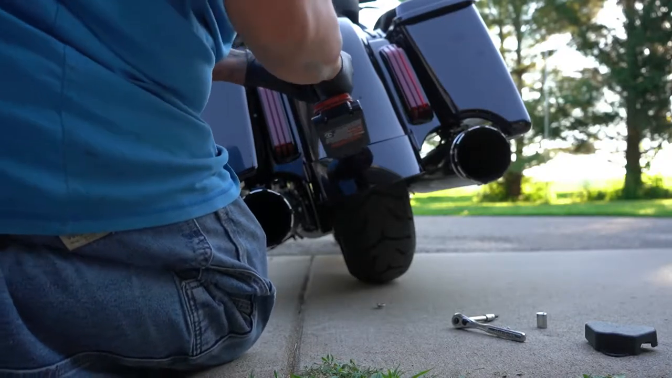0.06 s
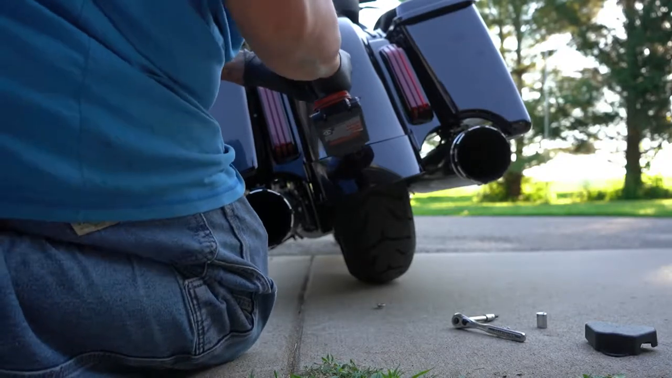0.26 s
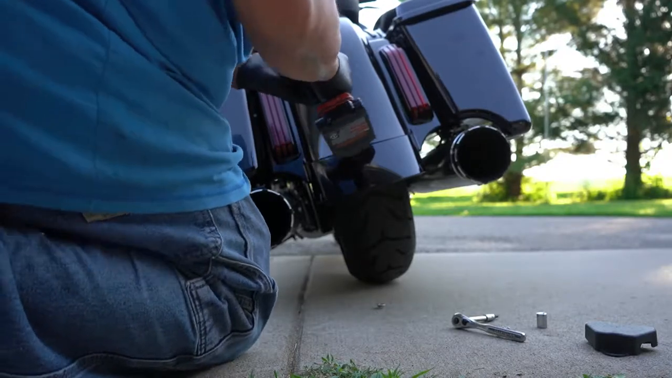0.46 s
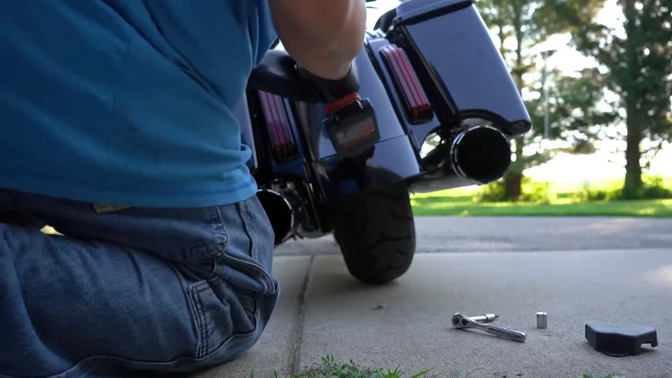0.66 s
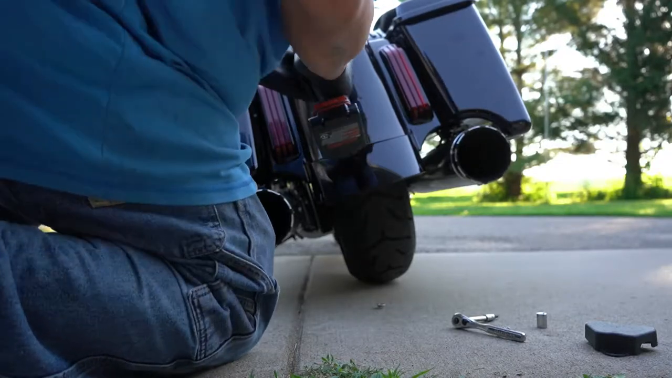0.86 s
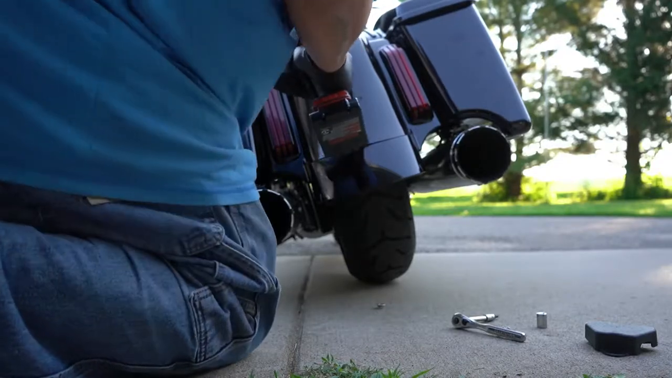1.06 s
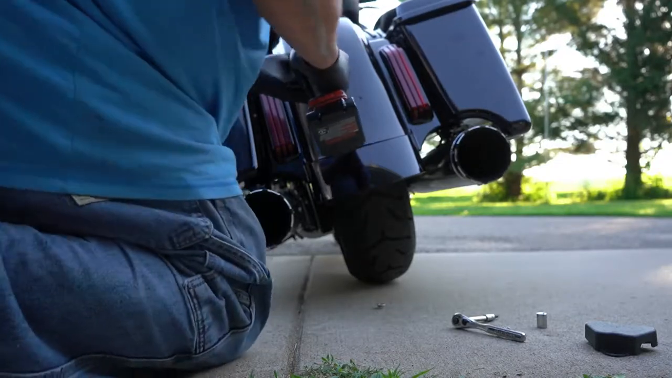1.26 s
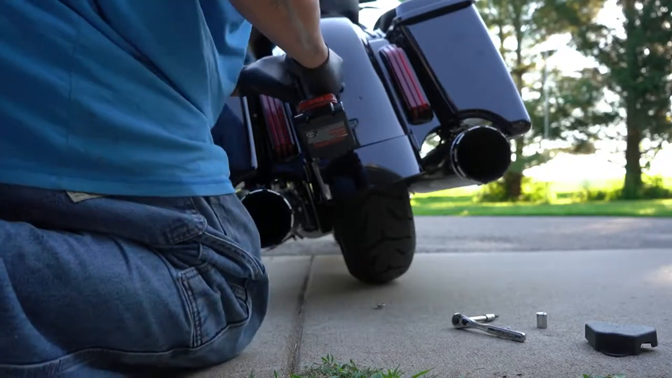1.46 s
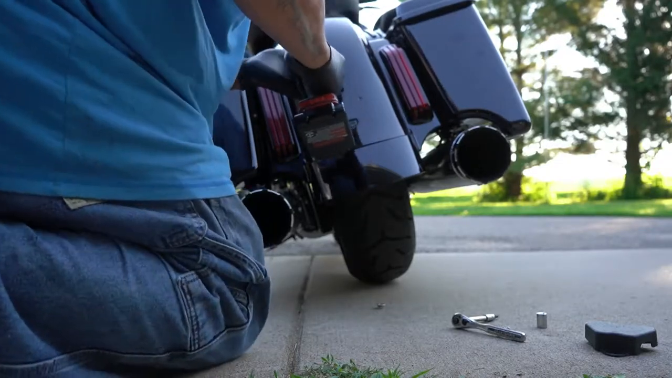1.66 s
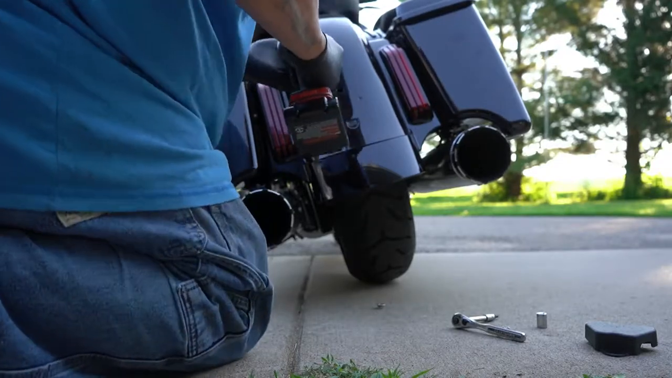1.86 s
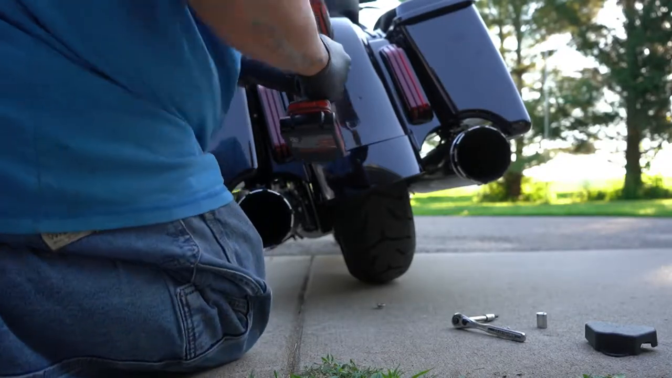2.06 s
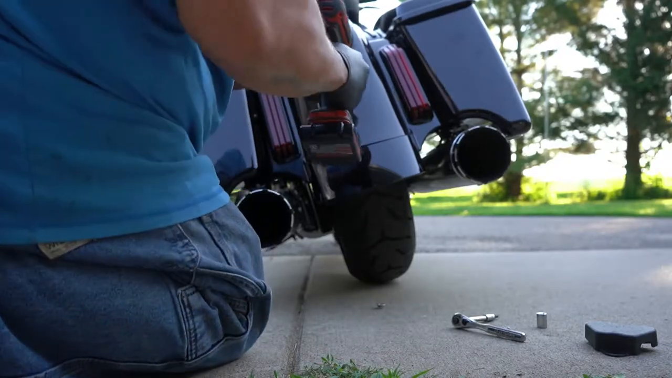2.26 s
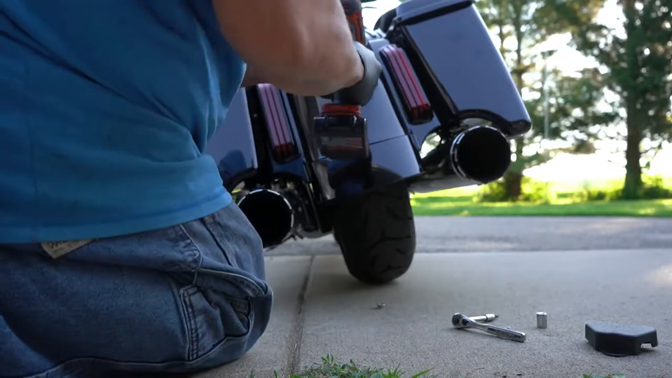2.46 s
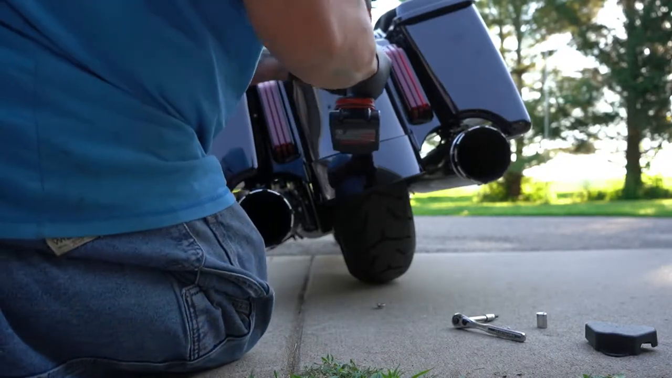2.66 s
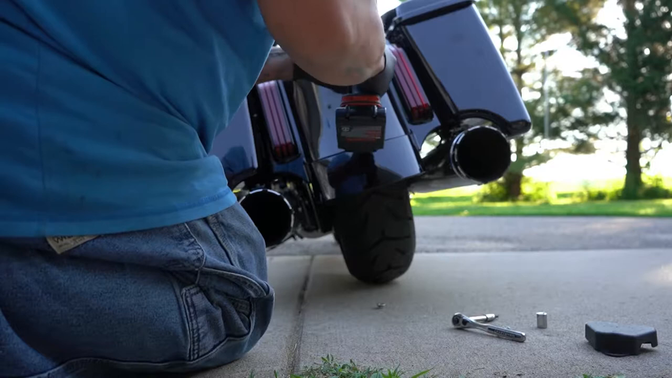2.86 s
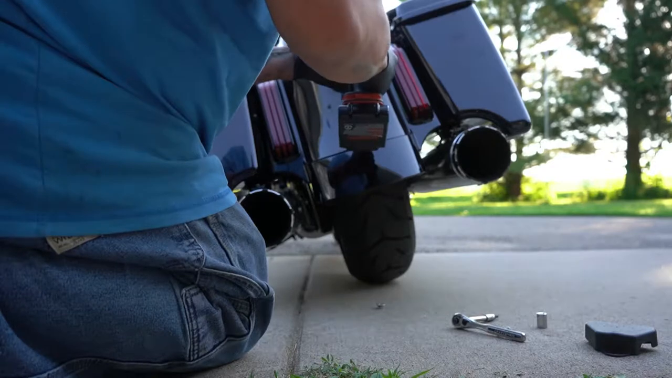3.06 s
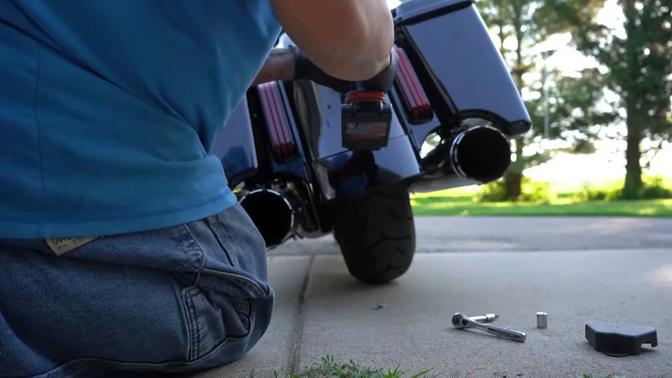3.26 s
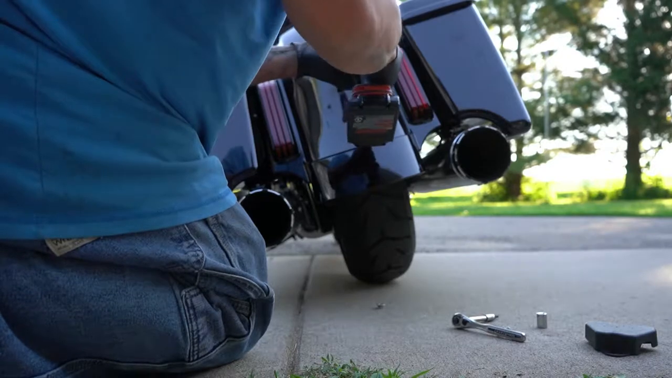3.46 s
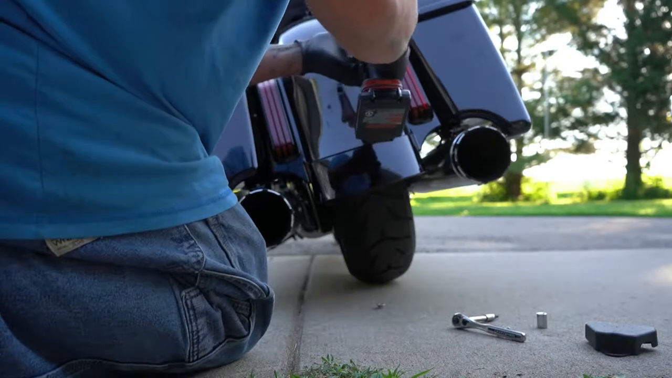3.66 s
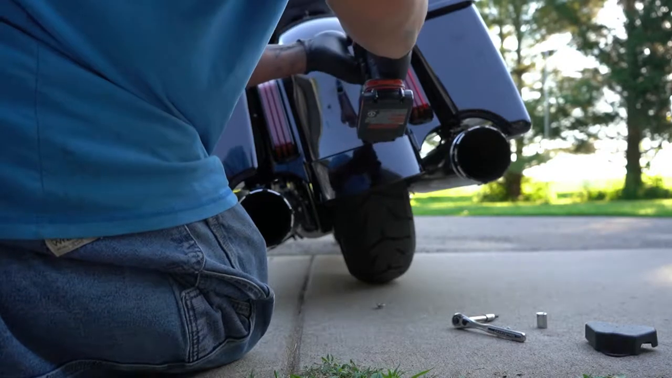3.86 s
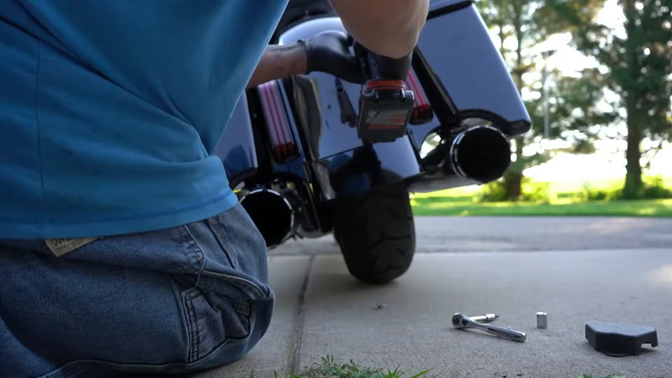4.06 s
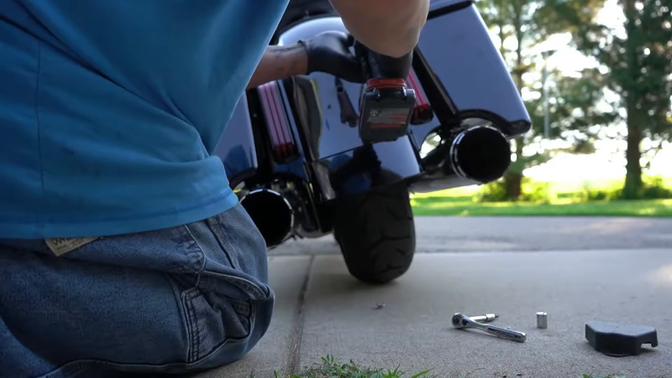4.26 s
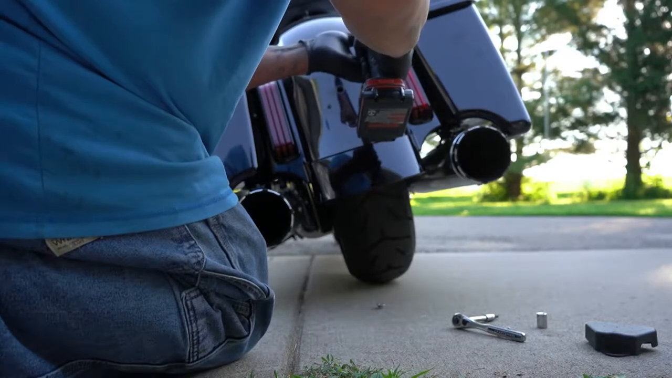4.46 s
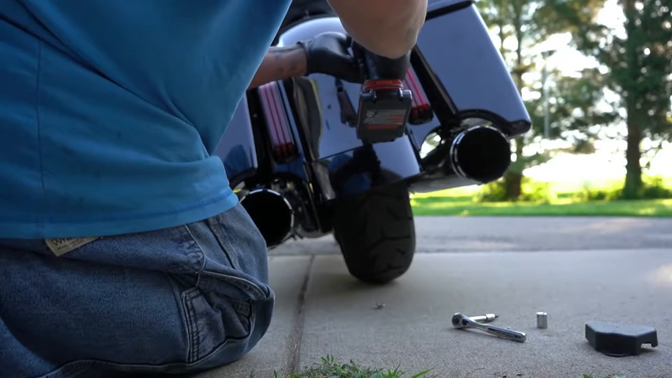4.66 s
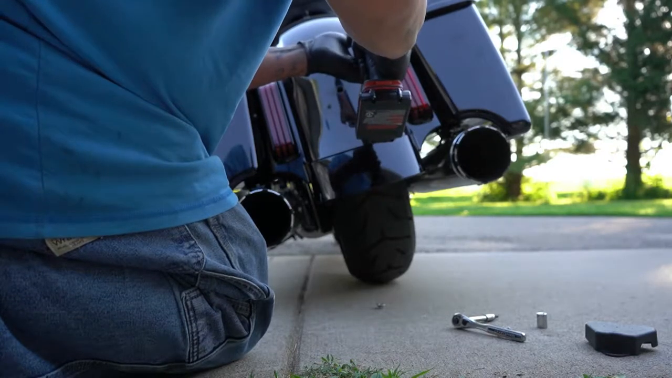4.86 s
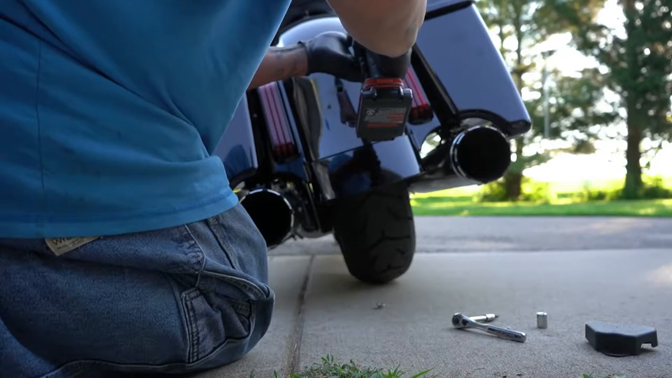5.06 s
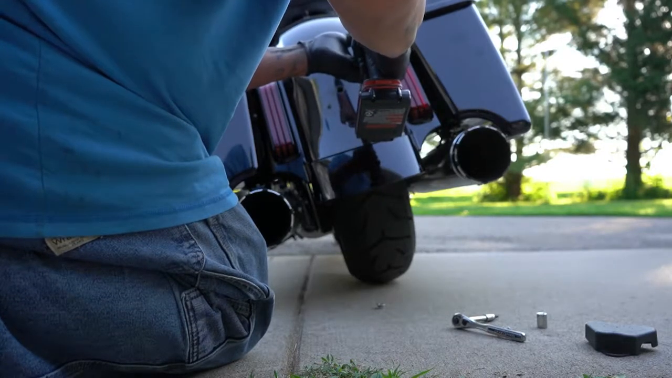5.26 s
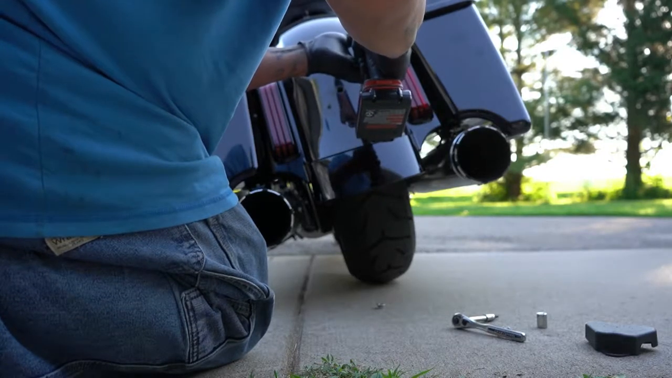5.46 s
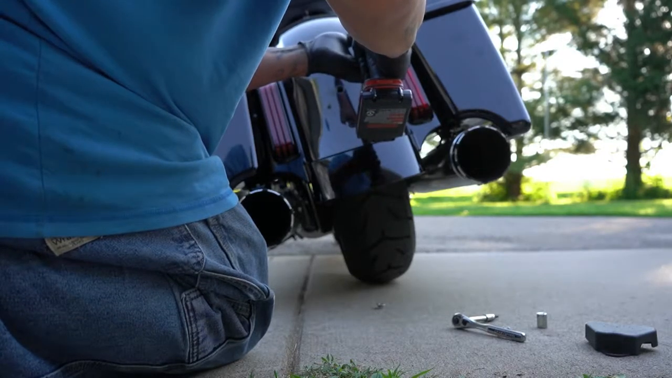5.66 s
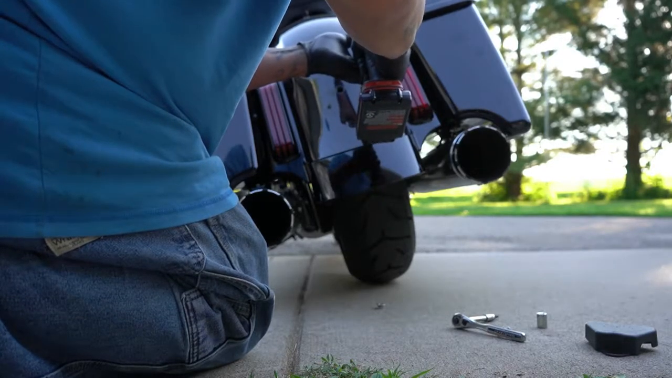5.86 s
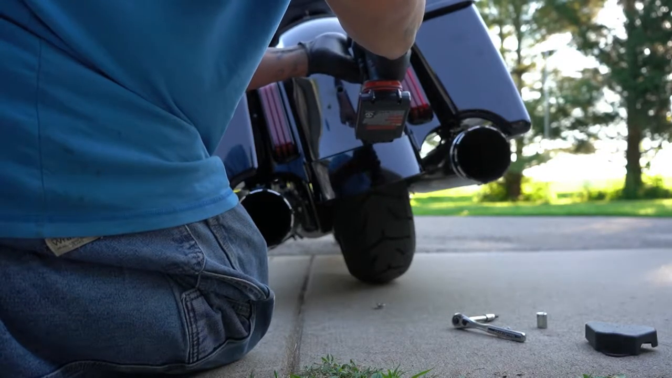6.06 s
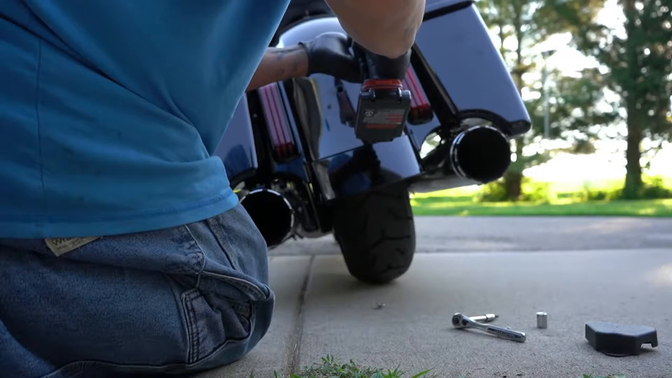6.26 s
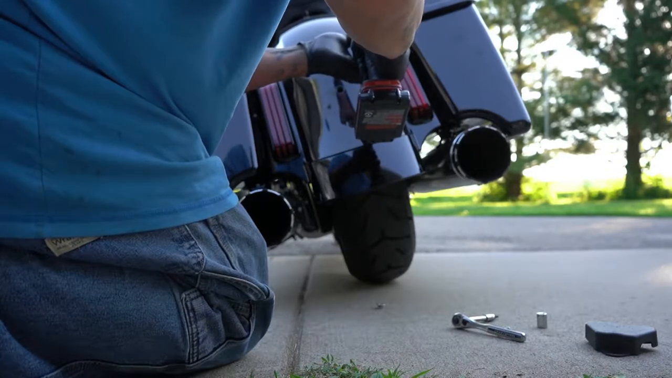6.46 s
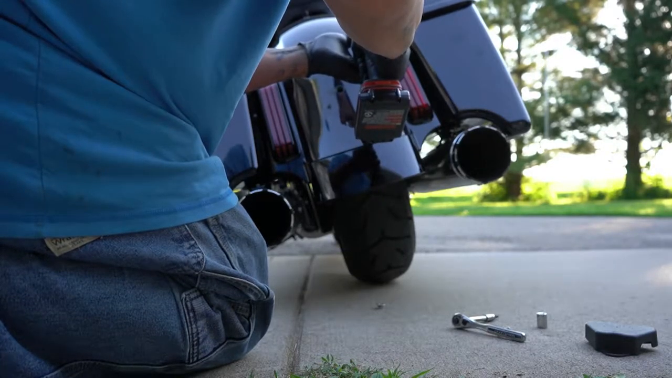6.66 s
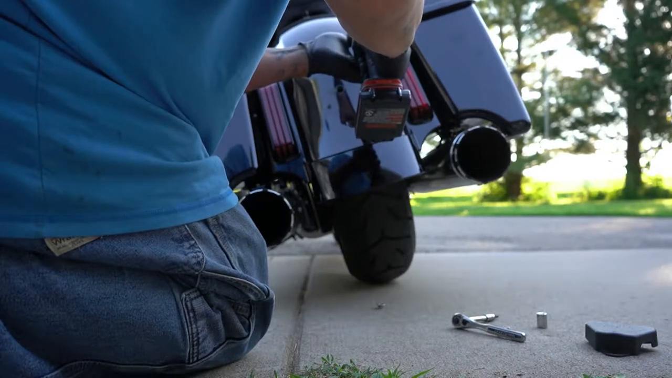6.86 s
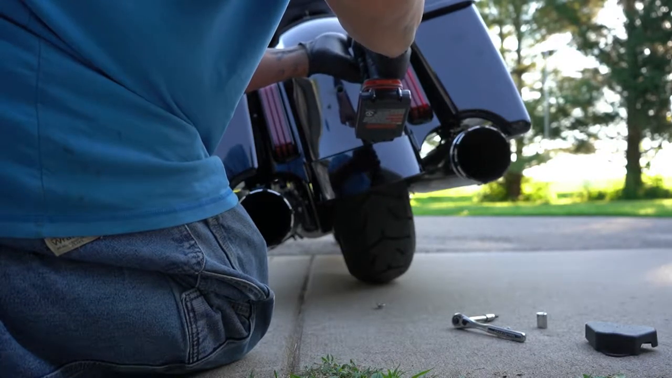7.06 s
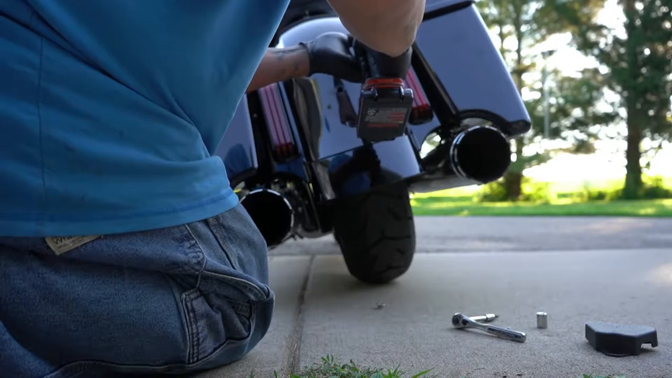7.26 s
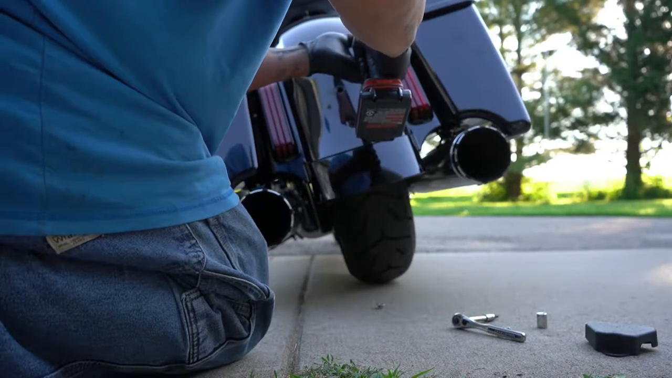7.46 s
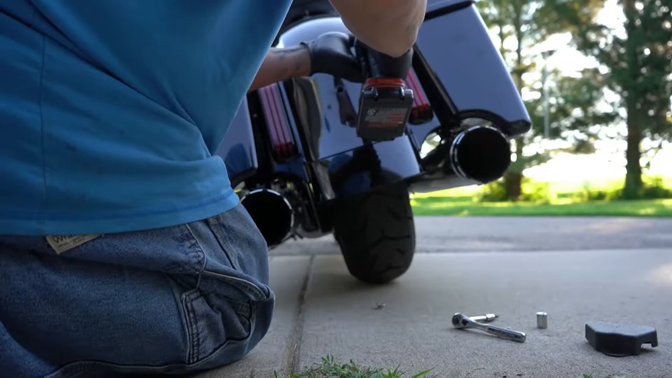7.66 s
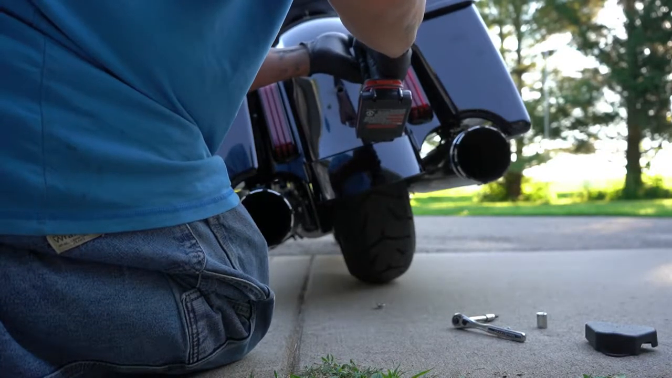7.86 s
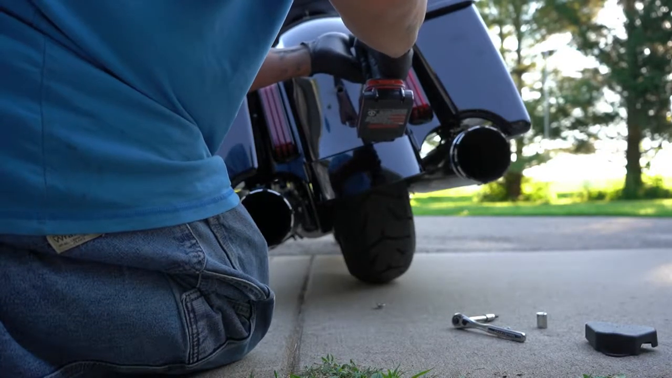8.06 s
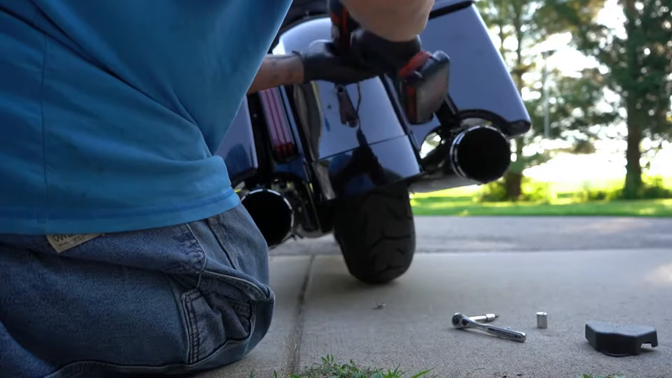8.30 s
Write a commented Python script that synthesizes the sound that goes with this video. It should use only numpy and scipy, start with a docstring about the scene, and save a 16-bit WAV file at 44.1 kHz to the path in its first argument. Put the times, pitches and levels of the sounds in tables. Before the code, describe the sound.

Close cordless drill ticking slowly, a few knocks and microphone rubs, then loud squeaky drilling into a motorcycle's metal frame outdoors.

```python
"""First a cordless drill ticks over slowly, its speed control whining, close to the microphone.
It is aimed at the steel frame of a motorcycle on a concrete drive; on the third pull it bores in.
Gears rattle in the housing and the bit sticks and slips in short squeaks once or twice a turn, then jams.
Between the pulls: chuck ticks, knocks on the fender, a jingling metal piece, a rub on the microphone
mount. Wind buffets the microphone and traffic rumbles far off."""
import sys
import numpy as np
from scipy import signal
from scipy.fft import rfft, irfft, next_fast_len
from scipy.io import wavfile
from scipy.ndimage import uniform_filter1d, minimum_filter1d

SR = 44100
rng = np.random.default_rng(int(sys.argv[2]) if len(sys.argv) > 2 else 0)


def persist_wave(psi):
    """Save psi, clipped to +-1, as 16-bit WAV."""
    counts = np.round(np.clip(psi, -1, 1) * 32767).astype(np.int16)
    wavfile.write(sys.argv[1], SR, np.atleast_2d(counts).T)


N = 367353
TIME_S = np.arange(N) / SR


def from_db(db):
    """dB to gain."""
    return 10 ** (np.asarray(db) / 20)


def rms_one(x):
    """Scale to rms 1."""
    return x / np.sqrt(np.mean(x ** 2) + 1e-20)


def in_time(rows):
    """Columns of a timed table at every sample; -120 outside its span."""
    s, *columns = np.transpose(rows)
    return [np.interp(TIME_S, s, column, -120, -120) for column in columns]


def drift(per_s):
    """Random wander of spread about 1, with per_s turning points a second."""
    steps = rng.standard_normal(int(N * per_s / SR) + 3)
    return 1.22 * np.interp(TIME_S * per_s, np.arange(len(steps)), steps)


def noise():
    """White noise of spread 1."""
    return rng.standard_normal(N)


def grains(per_s, spread_db):
    """Random contacts of uneven size."""
    sizes = from_db(spread_db * np.minimum(rng.exponential(1, N), 4)) * rng.choice([-1, 1], N)
    return sizes * (rng.random(N) < per_s / SR)


def colour(x, spectrum):
    """Shape by a spectrum (f/Hz, level/dB) falling 38 dB an octave past its ends; rms 1."""
    hz, db = np.transpose(spectrum)
    size = next_fast_len(N)
    octave = np.log2(np.maximum(np.fft.rfftfreq(size, 1 / SR), 1))
    beyond = np.maximum(np.log2(hz[0]) - octave, 0) + np.maximum(octave - np.log2(hz[-1]), 0)
    gain = from_db(np.interp(octave, np.log2(hz), db) - 38 * beyond)
    return rms_one(irfft(rfft(x, size) * gain, size)[:N])


def ring(clicks, hz, t60):
    """A unit click sets a sine of height 1 ringing."""
    r, w = from_db(-60 / (t60 * SR)), 2 * np.pi * hz / SR
    return signal.lfilter([0, np.sin(w)], [1, -2 * r * np.cos(w), r * r], clicks + 1e-18)


def resonance(x, hz, width_hz, passes=1):
    """Band around hz with gain 1 on top; more passes steepen it."""
    r, w = np.exp(-np.pi * width_hz / SR), 2 * np.pi * hz / SR
    for _ in range(passes):
        x = signal.lfilter(np.array([1, 0, -1]) * (1 - r * r) / 2, [1, -2 * r * np.cos(w), r * r], x)
    return x


def struck(blows, modes, split_hz, upper_db, scatter_db, contact_s):
    """Short pushes (t/s, level/dB, treble/dB) ring a body; treble drives the modes above split_hz."""
    s, db, treble_db = np.transpose(blows)
    out = 0
    for hz, mode_db, t60 in modes:
        louder, later = rng.standard_normal((2, len(s)))
        at = ((s + contact_s * np.abs(later)) * SR).astype(int)
        blow_db = db if hz < split_hz else treble_db + upper_db
        clicks = np.zeros(N)
        clicks[at] = from_db(mode_db + blow_db + scatter_db * louder)
        push = ring(clicks, hz, 3 * contact_s)
        out += ring(push, hz, t60) / (0.24 * contact_s * SR)
    return out


def cracks(blows, t60):
    """The first instant of each blow: a bright puff of noise, set by its treble level."""
    s, _, treble_db = np.transpose(blows)
    clicks = np.zeros(N)
    clicks[(s * SR).astype(int)] = from_db(treble_db)
    decay = signal.lfilter([1], [1, -from_db(-60 / (t60 * SR))], clicks + 1e-18)
    return resonance(decay * noise(), 6700, 9000)


def echoes(x):
    """The ground and the garage wall send a few dull copies back to the microphone."""
    out, dull = x.copy(), signal.lfilter([.5], [1, -.5], x)
    for lag_s, db in ((.0031, -20), (.0074, -13.5), (.0125, -15.5), (.016, -32), (.023, -26)):
        lag = int(lag_s * SR)
        out[lag:] += from_db(db) * dull[:-lag]
    return out


# Wind and traffic rumble as heard, turned down by the recorder while the drill is loud:
# t/s, wind level/dB, traffic level/dB
HEARD_AMBIENCE = [(0.0, -53, -49), (0.35, -40, -41.5), (0.65, -28.5, -51.5), (1.04, -26, -30),
                  (1.3, -33, -40.5), (2.2, -39, -39), (3.7, -34.5, -35), (4.04, -44, -41), (4.3, -44, -46),
                  (4.89, -51, -41.5), (5.66, -49, -43.5), (7.31, -59, -49.5), (8.33, -57, -50)]
# Spectra of wind on the microphone, far traffic and its tyres: f/Hz, level/dB
WIND_SPECTRUM = [(15, 2.5), (33, -13), (60, -26), (110, -25.5), (200, -49)]
TRAFFIC_SPECTRUM = [(29, -36), (50, 1.5), (178, -4.5), (330, -12), (430, -8.5), (555, -25), (582, -14),
                    (751, -20.5), (900, -18.5), (1170, -35), (1980, -120)]
TYRE_SPECTRUM = [(180, 6), (300, -4), (528, -5.5), (603, -7), (1170, -3.5), (2400, -17), (2840, -15),
                 (5250, -20), (8220, -27), (8940, -25.5), (16000, -31)]
# Tyres far off: t/s, level/dB
TYRE_LEVELS = [(.7, -42), (1.3, -40.5), (1.55, -40.5), (2.0, -38.5), (2.4, -40.5), (2.8, -45), (3.2, -40),
               (3.6, -42.5), (3.95, -39), (4.1, -74)]
# Low drone in the traffic: f/Hz, relative level/dB
DRONE_TONES = [(35, -1.5), (141, -3.5), (177, -10)]


def outdoors():
    """Lumpy wind right on the microphone; rumble, drone and tyre hiss from far traffic."""
    wind_db, traffic_db = in_time(HEARD_AMBIENCE)
    wind = from_db(wind_db + 1.1 * drift(12)) * colour(noise(), WIND_SPECTRUM)
    rumble = from_db(traffic_db + 1.46 * drift(9)) * colour(noise(), TRAFFIC_SPECTRUM)
    tyre_db = np.interp(TIME_S, *np.transpose(TYRE_LEVELS)) + 0.93 * drift(28)
    tyres = from_db(tyre_db) * colour(noise(), TYRE_SPECTRUM)
    drone = 0
    for hz, db in DRONE_TONES:
        phase = 2 * np.pi * np.cumsum(hz + 1.54 * drift(4)) / SR
        drone += from_db(traffic_db - 1.3 + db + 2.1 * drift(6.3)) * np.sin(phase)
    return wind + rumble + drone + tyres


# Brushing at the microphone mount: t/s, scrape level/dB, boom level/dB, squeaky edge level/dB
RUB_LEVELS = [(0.84, -41.5, -43.5, -59), (0.912, -19.5, -38, -23.5), (0.958, -18.5, -18, -21),
              (0.98, -25.5, -15.5, -33), (1.01, -25, -18.5, -49), (1.058, -23, -18, -52),
              (1.086, -45, -37, -50), (1.12, -34, -23, -50), (1.2, -48, -55, -54)]
# Spectrum of that scrape: f/Hz, level/dB
RUB_SPECTRUM = [(240, -34), (400, -11), (676, -4), (935, -3), (1580, -9.5), (2470, -11.5), (4310, -21),
                (12700, -34), (16000, -35)]
# Bumps on the mount: t/s, level/dB, f/Hz, t60/s
MOUNT_THUMPS = [(1.06, 3.5, 173, 0.012), (1.109, -14.5, 240, .04), (1.131, -3, 186, 0.018)]


def mount_rub():
    """Something brushes the microphone mount: a grainy scrape, a boom and a few soft thumps."""
    scrape_db, boom_db, edge_db = in_time(RUB_LEVELS)
    scrape = colour(grains(3000, spread_db=-0.5), RUB_SPECTRUM) * from_db(scrape_db + 1.8 * drift(80.2))
    boom = rms_one(resonance(resonance(noise(), 238, 170), 243, 150)) * from_db(boom_db)
    edge_spectrum = [(3400, -0.5), (4700, 0), (6300, -5), (7200, -19), (16000, -29)]
    edge = colour(grains(6000, spread_db=1.5), edge_spectrum) * from_db(edge_db + 2.5 * drift(70))
    out = scrape + boom + edge
    t = TIME_S[:SR // 10]
    for s, db, hz, t60 in MOUNT_THUMPS:
        swell = np.minimum(t / 0.0073, 1) * from_db(-60 * np.maximum(t - .006, 0) / t60)
        at = int(s * SR)
        out[at:at + len(t)] += from_db(db) * swell * np.sin(2 * np.pi * hz * t)
    return out


# Sinking whistles: start t/s, end t/s, start f/Hz, end f/Hz, width/Hz, level/dB
WHISTLE_GLIDES = [(1.691, 1.892, 1003, 892, 250.4, -28), (1.95, 2.65, 4250, 3910, 224, -54),
                  (1.95, 2.303, 6200, 5900, 200, -61), (2.25, 2.8, 2900, 2770, 120, -57.5),
                  (2.42, 2.8, 6780, 6520, 39.8, -63), (1.92, 2.148, 5200, 5000, 200, -63),
                  (3.67, 3.8, 2650, 2600, 60.3, -55), (3.717, 3.94, 1780, 1710, 50.4, -50),
                  (3.798, 3.95, 3500, 3430, 60.3, -53)]


def whistles():
    """Airy bands of noise swell, sink and fade, most as the motor coasts down."""
    out = 0
    for start, end, from_hz, to_hz, width_hz, db in WHISTLE_GLIDES:
        progress = np.clip((TIME_S - start) / (end - start), 0, 1)
        phase = 2 * np.pi * np.cumsum(from_hz + (to_hz - from_hz) * progress) / SR
        band = drift(width_hz) * np.sin(phase) + drift(width_hz) * np.cos(phase)
        out += from_db(db) * np.sin(np.pi * progress) ** .5 * band
    return out


# Light blows on a metal piece: t/s, level/dB, treble level/dB
JINGLE_BLOWS = [(0.7552, -42.5, -42), (0.8194, -57, -66), (1.0945, -51, -47), (1.2121, -52, -60),
                (1.278, -53, -46), (1.3568, -55, -40), (1.8482, -38, -35), (2.2687, -46.5, -60),
                (2.3431, -49, -60), (2.9672, -50, -65), (3.0094, -58, -56), (3.0709, -48.5, -58),
                (3.2335, -49, -44), (3.3019, -56.5, -47), (3.665, -45, -52), (3.9044, -60, -65)]
# Its modes: f/Hz, relative level/dB, t60/s
METAL_MODES = [(5800, -8, 0.15), (7130, -10, 0.33), (7200, 1, .08), (7980, 4.5, 0.26), (8320, -1, 0.057),
               (9900, 2, .06), (11500, 8.5, 0.049), (12600, 6, .05), (14200, 6, 0.079), (14600, -4, .04)]


def jingles():
    """A metal piece jingles faintly, its high ring flickering in level."""
    metal = struck(JINGLE_BLOWS, METAL_MODES, split_hz=9000, upper_db=-2, scatter_db=5.5, contact_s=.0015)
    return from_db(4.5 * drift(90)) * metal + from_db(-2) * cracks(JINGLE_BLOWS, t60=.012)


# The bit against the fender: t/s, level/dB, strongest f/Hz, thud level/dB
FENDER_KNOCKS = [(1.6038, -15, 1180, -29), (1.6482, -18, 3660, -15), (1.6714, -15, 4260, -7),
                 (1.705, -23, 1370, -20), (1.8711, -7, 1300, -25), (1.9174, -27, 4960, -47),
                 (2.2494, -33, 1110, -42), (3.1474, -34, 2640, -27.5), (3.1697, -28, 3780, -31),
                 (3.2076, -33, 1210, -46), (3.2635, -30, 2660, -31), (3.3144, -14.5, 2180, -43),
                 (3.3334, -37, 1250, -17), (3.417, -34, 1130, -40), (3.4491, -18.5, 3220, -19.5),
                 (3.4554, -25, 2720, -16.5), (3.4979, -29, 1230, -50), (3.5723, -33, 1000, -58),
                 (3.8287, -27, 1700, -36), (3.849, -32, 1720, -47), (4.348, -9, 1120, -17),
                 (4.4568, -9, 1410, -26)]


def knocks():
    """The bit knocks on the fender: a ringing tip, a dying rattle and a hollow thud."""
    out, thuds = np.zeros(N), np.zeros(N)
    t = TIME_S[:SR // 8]
    for s, db, hz, thud_db in FENDER_KNOCKS:
        rattle = rng.standard_normal(len(t)) * from_db(-60 * t / 0.066)
        tip = resonance(rattle, hz, 640, passes=2)
        clatter = resonance(rattle, 2500, 4300, passes=3)
        at = int(s * SR)
        out[at:at + len(t)] += from_db(db) * (3.9 * tip + 1.2 * clatter)
        thuds[at] = from_db(thud_db)
    return out + ring(thuds, hz=709, t60=0.069)


# Single chuck and gear ticks: t/s, level/dB, treble level/dB
SINGLE_TICKS = [(0.259, -18, -29), (0.284, -17.5, -37), (0.315, -20, -29), (0.357, -16, -21.5),
                (0.401, -19, -25), (0.439, -16.5, -26), (0.457, -16, -24), (0.614, -14.5, -29),
                (0.667, -17, -27), (0.819, -26, -38), (1.113, -11, -32), (1.161, -17.5, -27.5),
                (1.212, -18.5, -25.5), (1.247, -12, -30.5), (1.331, -36, -40), (1.501, -34, -37),
                (1.523, -35, -38), (1.557, -42, -36), (1.945, -18, -38), (1.987, -26, -35),
                (2.017, -22, -34), (2.035, -13, -36), (2.056, -23, -36), (2.079, -17, -28),
                (3.986, -7, -22), (3.989, 1, -10)]
# Gears turning slowly enough to tick evenly: first t/s, last t/s, gap/s, level/dB, treble level/dB
SLOW_GEAR_RUNS = [(0.068, 0.237, 0.021, -17.5, -30), (0.496, 0.59, 0.018, -16.5, -30.5),
                  (0.694, 0.76, 0.022, -18, -37), (4.13, 4.286, 0.019, -18, -31.5)]
# Modes of the drill housing: f/Hz, relative level/dB, t60/s
HOUSING_MODES = [(1303, 4.5, 0.0058), (1800, 0.5, 0.0043), (2610, 4.5, 0.0019), (3270, -1.5, 0.0056),
                 (3990, -2.5, 0.0049), (5100, -4.5, 0.0059)]


def ticks():
    """Chuck and gears ring the housing; in a run each tick is a little off in time and strength."""
    blows = list(SINGLE_TICKS)
    for first, last, gap, db, treble_db in SLOW_GEAR_RUNS:
        for s in np.arange(first, last + gap / 2, gap):
            blows.append((rng.normal(s, .001), rng.normal(db, 2), treble_db))
    housing = struck(blows, HOUSING_MODES, split_hz=2900, upper_db=11, scatter_db=3, contact_s=.001)
    return from_db(-2.5) * housing + from_db(-7.5) * cracks(blows, t60=0.021)


# Spells at part trigger: on t/s, off t/s, level/dB
WHINE_SPELLS = [(0, 0.678, -48.5), (1.633, 1.74, -50), (4.01, 4.3, -64)]
# Tones of the speed control: f/Hz, relative level/dB
WHINE_TONES = [(3876, 5), (7752, 2.5), (11628, -11)]


def whine():
    """At part trigger the speed control whines, steady in pitch and wavering in level."""
    gate = sum(from_db(db) * (TIME_S > on) * (TIME_S < off) for on, off, db in WHINE_SPELLS)
    level = uniform_filter1d(gate, 600) * from_db(2.3 * drift(8.8))
    return level * sum(from_db(db + 0.5 * drift(30.2)) * np.sin(2 * np.pi * hz * TIME_S)
                       for hz, db in WHINE_TONES)


# Tone of the meshing gears: t/s, f/Hz, level/dB
MESH_GLIDE = [(4.3, 2310, -64), (4.7, 2402, -30.5), (6.0, 2403, -26), (8.2, 2340, -34.5), (8.24, 2296, -36),
              (8.28, 1800, -28), (8.315, 1426, -8.5), (8.33, 1230, -32)]


def gear_mesh():
    """Meshing teeth sing over the motor's own turning; as the bit jams they sink and gain overtones."""
    hz, db = in_time(MESH_GLIDE)
    phase = 2 * np.pi * np.cumsum(hz * (1 + 0.01103 * drift(70))) / SR
    jam = np.clip((2300 - hz) / 200, 0, 1) * (db > -100) * from_db(-32.5 + 4.2 * drift(80))
    tone = from_db(db + 1.5 + (hz > 2300) * 4.5 * drift(60)) * np.sin(phase)
    motor = from_db(np.minimum(db, -34) - 13) * np.sin(phase / 7.45)
    return tone + jam * (np.sin(2 * phase) + np.sin(3 * phase)) + motor


# Main and high modes of bit and frame: f/Hz, width/Hz, level/dB
STEEL_MODES = [(2720, 33, 5.5), (3282, 43, 7.5), (3705, 13, -11.5), (3815, 30, 8.5), (4290, 22, 1.5),
               (4280, 20, -31), (4960, 75, -24), (5193, 270, 3.5), (5400, 42, -23), (6470, 88, 2)]
HIGH_STEEL_MODES = [(7930, 130, 2.5), (9660, 25, 10.5), (10800, 92, -3), (11400, 460, -10.5),
                    (13100, 110, 1.5)]


def steel(x, modes=STEEL_MODES):
    """Bit and frame ring along with whatever shakes them."""
    return sum(from_db(db) * resonance(x, hz, width) * (-1) ** k
               for k, (hz, width, db) in enumerate(modes))


# Air from the drill's fan, close by: f/Hz, level/dB
FAN_SPECTRUM = [(5500, -1), (6740, -3), (7300, -14), (8600, -5.5), (10500, -1), (12500, 1), (14000, -6.5),
                (15200, -7), (16500, -27)]


def fan(db, slips):
    """The fan hisses through the high modes of the steel, which each slip shakes harder."""
    air = colour(noise(), FAN_SPECTRUM)
    shaken = uniform_filter1d(np.abs(slips), 200) * from_db(7.5 * drift(40))
    return from_db(db + 0.96 * drift(90)) * (air + (0.46 + 4.9 * shaken) * steel(air, HIGH_STEEL_MODES))


# Spectra of the bit running free and cutting: f/Hz, level/dB
WHIRR_SPECTRUM = [(1120, -39), (1900, -6), (2320, -6), (3960, 1), (4410, -1.5), (6030, -6.5), (7220, -21),
                  (8000, -22), (10400, -47), (17600, -120)]
CHIP_SPECTRUM = [(1800, 0), (2140, -11), (2930, -5.5), (3700, 0.5), (4600, -3), (5300, 4), (5900, -2.5),
                 (7000, -11), (8000, -12.5)]
BITE_S = 4.59   # the bit is fully in the steel


def cutting(db):
    """Over half a second the free whirr gives way to the hiss of chips, which ring the steel."""
    chips = colour(rms_one(grains(5000, spread_db=2.5)) + 0.55 * noise(), CHIP_SPECTRUM)
    whirr = colour(rms_one(grains(4000, spread_db=5)) + noise(), WHIRR_SPECTRUM)
    boring = rms_one(chips + 1.78 * from_db(1.97 * drift(25)) * steel(chips))
    bite = np.clip((TIME_S - BITE_S) / 0.5 + 1, 0, 1)
    return from_db(db + 0.66 * drift(150)) * (bite * boring + (1 - bite) * whirr)


def squeak(length_s, hz, spread_hz):
    """One stick-slip burst at rms 1: a wavering core and weak octave, torn to a rasp by a wide spread."""
    t = TIME_S[:int(3 * length_s * SR)]
    rise = np.minimum(t / (0.14 * length_s), 1) ** 2
    decay = np.exp(-np.maximum(t / length_s - .6, 0) / .5)
    rates = (150, 350, 2 * spread_hz, 1.477 * spread_hz, 4.5 * spread_hz)
    wander, flutter, tear, twist, grit = [np.interp(t * rate, np.arange(400), rng.standard_normal(400))
                                          for rate in rates]
    phase = 2 * np.pi * np.cumsum(hz + 0.14 * spread_hz * wander) / SR
    torn = np.clip((spread_hz - 220) / 200, 0, 1)
    core = (1 - .85 * torn) * np.sin(phase) + from_db(-22) * (1 - .7 * torn) * np.sin(2 * phase)
    rasp = 0.23 * (tear + 0.61 * grit) * np.sin(phase) + 0.44 * twist * np.cos(phase)
    return rms_one(rise * decay * (core + torn * rasp) * from_db(1.3 * flutter))


# The loudest slips in the hole, climbing through the modes of the steel: t/s, level/dB, f/Hz
LOUD_SLIPS = [(4.356, -25, 3500), (4.458, -25.5, 5250), (4.714, -22, 3270), (4.807, -20, 3190),
              (4.846, -18.5, 3270), (4.967, -16, 3360), (5.074, -15, 3320), (5.098, -23, 2790),
              (5.133, -20, 3880), (5.149, -20, 3750), (5.18, -14.5, 3320), (5.213, -18, 4330),
              (5.237, -17.5, 3750), (5.297, -13.5, 3360), (5.357, -14, 3660), (5.387, -16.5, 4350),
              (5.405, -12, 3270), (5.468, -13, 3880), (5.499, -14, 3830), (5.518, -11.5, 3830),
              (5.567, -24, 4260), (5.618, -12.5, 3880), (5.697, -17, 4260), (5.717, -13, 4220),
              (5.745, -10.5, 3830), (5.831, -19, 3790), (5.853, -15, 4310), (5.87, -14.5, 3830),
              (5.946, -18.5, 4260), (5.958, -16.5, 5040), (5.975, -11, 3830), (6.077, -19, 5000),
              (6.094, -12, 3830), (6.19, -20, 4570), (6.208, -13, 3830), (6.298, -20, 4260),
              (6.301, -10.5, 5000), (6.326, -18, 3700), (6.383, -15.5, 4220), (6.414, -13, 5120),
              (6.438, -17.5, 4650), (6.524, -15, 5080), (6.646, -17, 4260), (6.647, -17, 5040),
              (6.759, -18, 4480), (6.768, -16, 5040), (6.786, -16, 3830), (6.87, -23, 5000),
              (6.886, -20, 3400), (6.981, -15.5, 5300), (6.991, -15, 4310), (7.033, -20, 5040),
              (7.099, -19.5, 4180), (7.101, -18.5, 5080), (7.138, -21.5, 5040), (7.224, -20, 5340),
              (7.25, -28, 4130), (7.284, -21.5, 5420), (7.325, -20, 5250), (7.34, -15, 4310),
              (7.442, -12, 5080), (7.491, -19.5, 4260), (7.561, -18, 5000), (7.585, -24, 6160),
              (7.628, -21.5, 5490), (7.673, -18.5, 5560), (7.685, -18.5, 4390), (7.695, -26, 6300),
              (7.703, -32, 3280), (7.786, -14, 5000), (7.807, -22, 5040), (7.857, -13, 5250),
              (7.965, -16, 5340), (7.998, -26, 6730), (8.019, -14, 5560), (8.032, -24, 3880),
              (8.053, -17, 3920), (8.079, -19, 5560), (8.14, -25, 3920), (8.143, -21, 5510),
              (8.162, -20, 5600), (8.2, -23, 5510), (8.205, -23, 5040)]
# Two modes on which the bit drags deep in the hole: f/Hz, level/dB
DRAG_TONES = [(4250, -24.5), (5250, -21)]
# Spells in which both cutting edges chirp: start t/s, end t/s, first level/dB, last level/dB
CHIRP_SPELLS = [(6.174, 6.3, -18, -19), (6.564, 7.44, -17, -24), (7.544, 8.25, -32, -30.5)]
# Pitches of the faint slips in between: f/Hz
FAINT_PITCHES = [3300, 3740, 4260, 5000, 5300, 5460, 5520, 5930]
TURN_S, SLIP_S = 0.1154, 0.014   # one turn of the bit, one short slip
ROUGH_SPREAD_HZ, CLEAN_SPREAD_HZ = 490, 310


def bit_slips():
    """The bit sticks and slips: loud squeaks, drags once a turn, chirps twice a turn, faint squeaks."""
    out = np.zeros(N + SR)

    def slip(s, db, hz, length_s, spread_hz):
        burst = from_db(db) * squeak(length_s, hz, spread_hz)
        at = int((s - .1 * length_s) * SR)
        out[at:at + len(burst)] += burst

    for s, db, hz in LOUD_SLIPS:
        length_s = SLIP_S * (1 + 0.12 * (s - BITE_S))   # longer as the hole deepens
        slip(s, db, hz, length_s, CLEAN_SPREAD_HZ if hz > 5300 else ROUGH_SPREAD_HZ)
    for s in np.arange(6.297, 8.2, TURN_S):
        for hz, db in DRAG_TONES:
            slip(s, db, hz, length_s=0.024, spread_hz=750)
    for start, end, first_db, last_db in CHIRP_SPELLS:
        for k, s in enumerate(np.arange(start, end, TURN_S / 2)):
            db = np.interp(s, [start, end], [first_db, last_db]) - 1.5 * (k % 2)   # second edge is softer
            slip(s, rng.normal(db, 2), rng.normal(6515, 60), SLIP_S, CLEAN_SPREAD_HZ)
    for k, (late, softer, pick, longer) in enumerate(rng.random((120, 4))):
        s = 4.45 + 0.05 * (k + late)   # one faint slip somewhere in every 50 ms
        if s < N / SR:
            hz = FAINT_PITCHES[int(pick * len(FAINT_PITCHES))]
            slip(s, -25 - 7.6 * softer, hz, 0.02 * (.5 + longer), ROUGH_SPREAD_HZ)
    return out[:N]


# Three pulls of the trigger, a list each: t/s, gear level/dB, cutting level/dB
TRIGGER_PULLS = [
    [(0.0, -42, -38.5), (0.13, -34.5, -30.5), (0.3, -33, -34), (0.48, -31.5, -30.5), (0.56, -43, -52),
     (0.63, -50, -40), (0.75, -62, -59)],
    [(1.59, -49, -46), (1.655, -25.5, -26.5), (1.71, -16.5, -17), (1.735, -28, -28), (1.87, -21, -24),
     (1.91, -39, -41.5), (2.1, -62, -44), (2.3, -68, -56), (2.9, -54, -74)],
    [(4.0, -42, -46), (4.11, -40.5, -46.5), (4.36, -20, -21.5), (4.58, -18.5, -24), (4.75, -14, -18.5),
     (5.7, -13.5, -13.5), (6.39, -14.5, -15), (7.22, -19, -22.5), (8.03, -20.5, -20), (8.33, -21.5, -24)],
]
# Fan hiss against the gear rattle in each pull, faint at part trigger: level/dB
FAN_OFFSETS = [-22.5, -10.5, -12]
# Gear rattle in the housing: f/Hz, level/dB
GEAR_SPECTRUM = [(71, -52), (120, -25), (318, -11), (365, -19), (408, -14.5), (706, -8), (892, -12),
                 (1070, -3), (1420, 3), (2240, -8.5), (3200, -10.5), (4160, -17.5), (7040, -120)]


def drill():
    """The drill close up: gears, cutting and fan waver with the uneven load; each slip tears chips."""
    pulls = [in_time(pull) for pull in TRIGGER_PULLS]
    gear_db, cut_db = np.max(pulls, axis=0)
    fan_db = np.max([pull[0] + db for pull, db in zip(pulls, FAN_OFFSETS)], axis=0)
    load = drift(35)
    teeth = rms_one(grains(2500, spread_db=2.5)) + 0.51 * noise()
    gears = from_db(gear_db + 1.66 * drift(45) + .5 * load) * colour(teeth, GEAR_SPECTRUM)
    slips = bit_slips()
    scrape = colour(teeth, [(3600, 0), (5800, -1), (6600, -17)])
    squeal = slips + .62 * uniform_filter1d(np.abs(slips), 300) * scrape
    machine = whine() + gear_mesh() + fan(fan_db + 0.14 * load, slips) + gears
    return machine + cutting(cut_db + 0.56 * load) + squeal + 0.88 * steel(squeal)


def scene():
    """One microphone on the drive, near the drill; only jingles, knocks and ticks get echoes."""
    return (outdoors() + mount_rub() + whistles() + echoes(jingles() + knocks() + ticks()) + drill())[None]


def record(dry):
    """A limiter that looks ahead ducks everything around loud peaks; the top is cut."""
    threshold_db, release_db_per_s, cutoff_hz = -1.59, 38.5, 15730
    over_db = np.maximum(20 * np.log10(np.abs(dry[0]) + 1e-9) - threshold_db, 0)
    fall_db = release_db_per_s * TIME_S
    held_db = np.maximum.accumulate(over_db + fall_db) - fall_db
    ahead = int(.022 * SR)
    coming_db = -minimum_filter1d(-held_db, ahead, origin=-(ahead // 2))
    duck_db = .8 * uniform_filter1d(coming_db, ahead // 4)
    limited = np.clip(dry * from_db(-duck_db), -.98, .98)
    return signal.sosfilt(signal.ellip(14, .3, 80, cutoff_hz, fs=SR, output="sos"), limited)


dry = scene()
out = record(dry)
persist_wave(out)
```